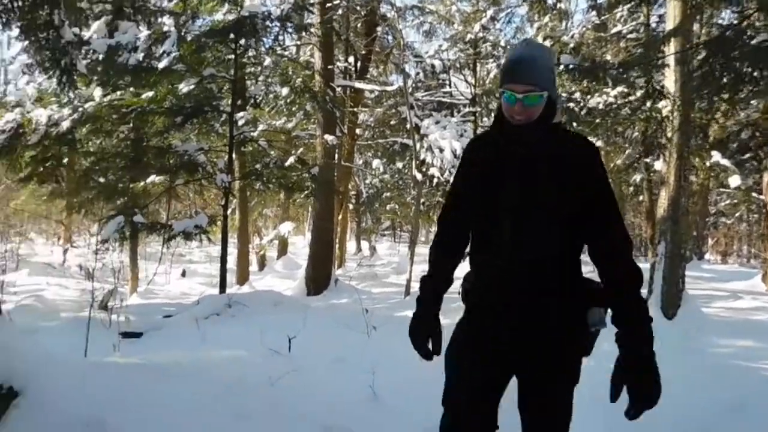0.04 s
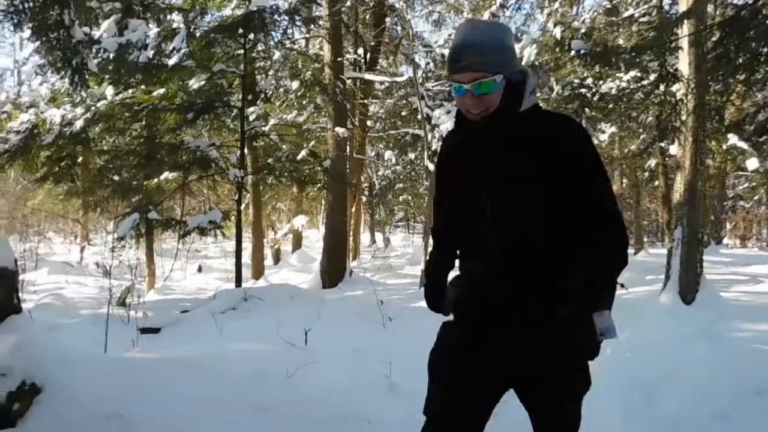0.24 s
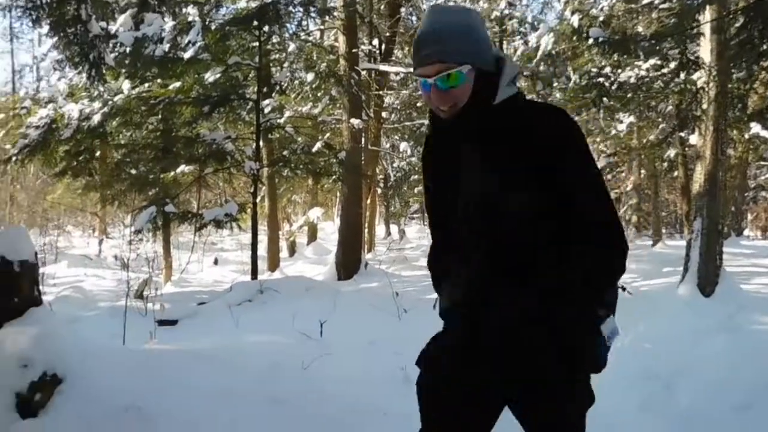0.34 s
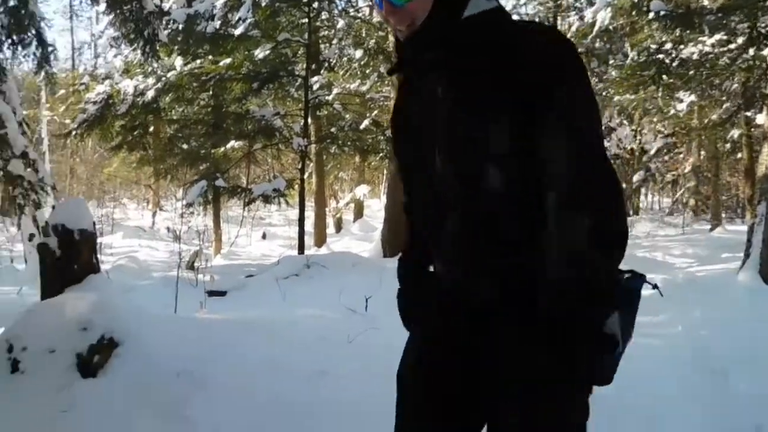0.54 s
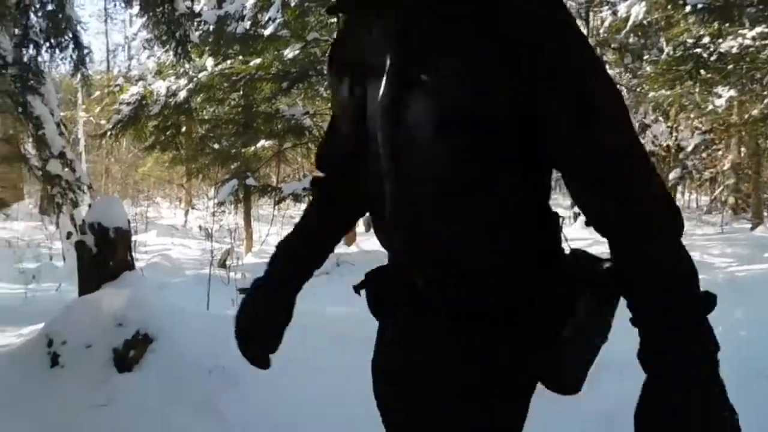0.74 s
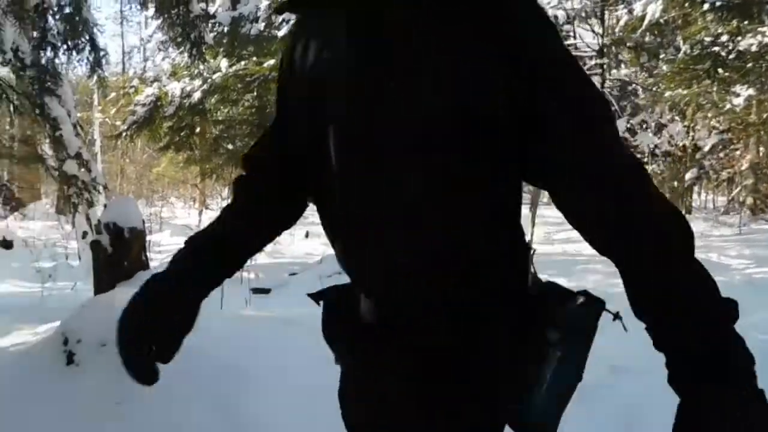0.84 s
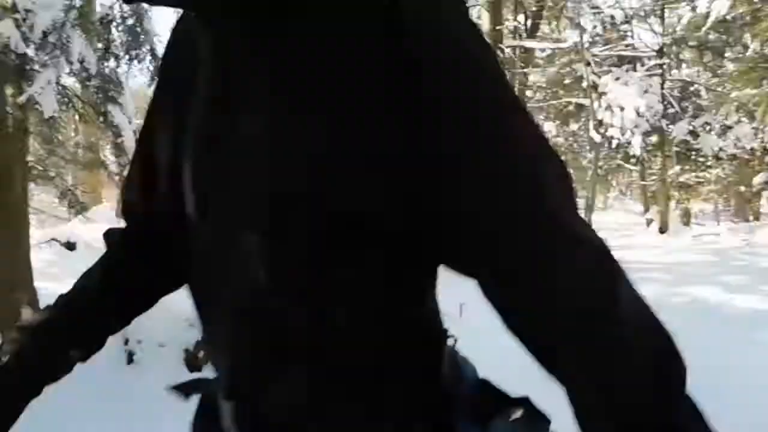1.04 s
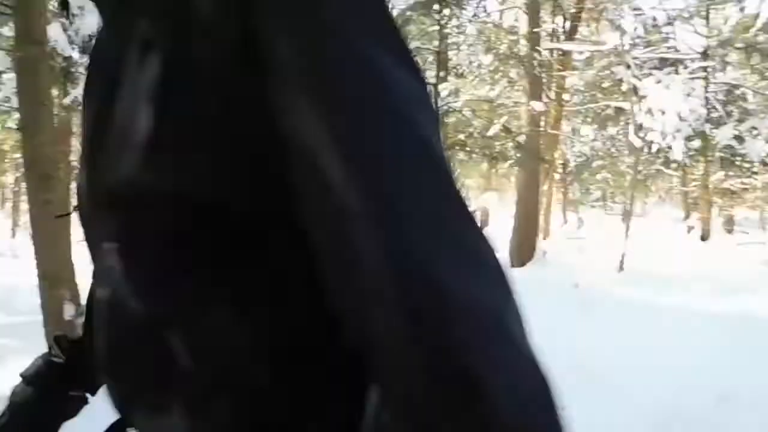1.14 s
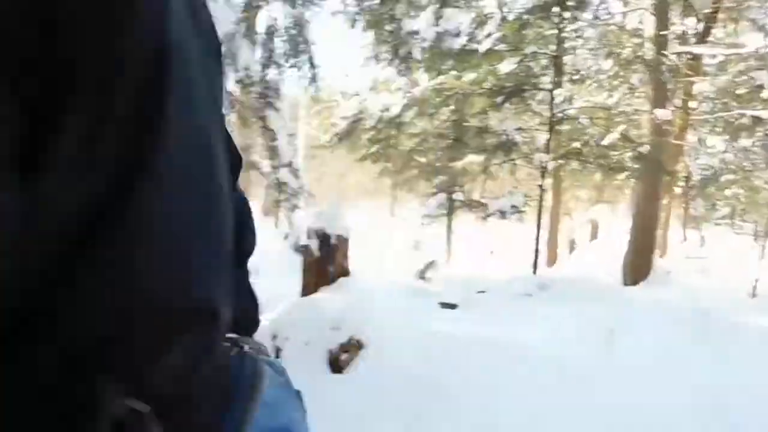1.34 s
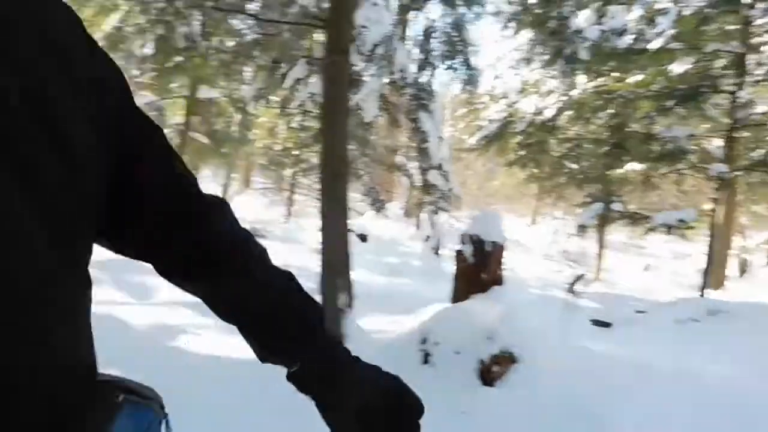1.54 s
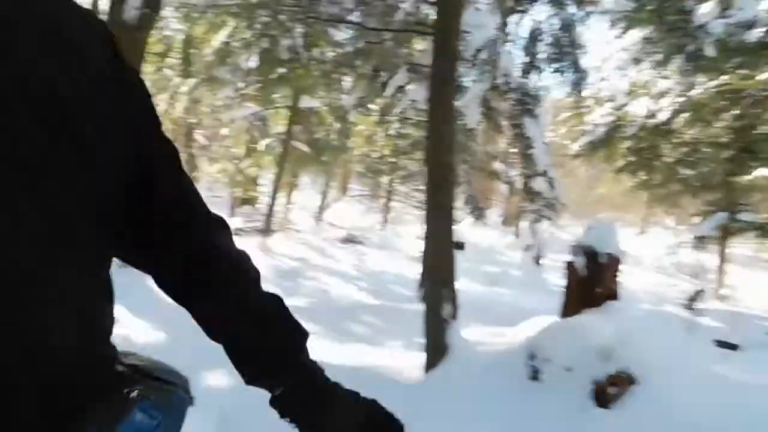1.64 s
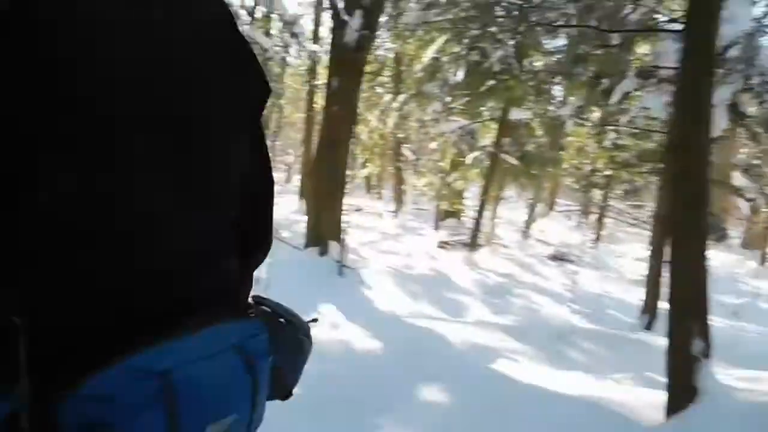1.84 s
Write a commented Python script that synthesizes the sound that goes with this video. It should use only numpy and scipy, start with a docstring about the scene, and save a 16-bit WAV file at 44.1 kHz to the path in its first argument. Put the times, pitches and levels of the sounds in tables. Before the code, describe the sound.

Boots crunch through deep, cold snow in three close steps, each a gritty cluster of creaks, knocks and squeaks with a powdery hiss; a soft brush between the first two, quiet forest air around, microphone near.

```python
"""Boots press through deep, cold snow for three steps in a quiet forest: random grain fractures, filtered and
swung in level by jerks, form each crunch; sparser fractures form a dull thud, denser ones a hiss of powder
and jacket. Stick-slip oscillation gives creaks, and decaying sines give single slips and brittle snaps.
A leg brushes through snow between two steps, faint decaying noise stands for echoes from the trees, and
coloured noise for the still air."""
import sys
import numpy as np
from scipy import signal
from scipy.fft import rfft, irfft, next_fast_len
from scipy.io import wavfile

SR = 44100
rng = np.random.default_rng(int(sys.argv[2]) if len(sys.argv) > 2 else 0)


def persist_wave(psi):
    """Save psi, clipped to +-1, as 16-bit WAV."""
    counts = np.round(np.clip(psi, -1, 1) * 32767).astype(np.int16)
    wavfile.write(sys.argv[1], SR, np.atleast_2d(counts).T)


N = 83790  # length in samples

# Background of still air. Each row: frequency in Hz, density in dB per Hz.
FOREST = [(15, -35), (25, -7.5), (114, -11), (217, -5.5), (439, -6), (3000, -14.5), (4610, -22.5),
          (9070, -26.5), (11600, -19.5), (16000, -27.5)]
# Faint air movement. Each row: frequency in Hz, density in dB per Hz.
FOREST_RUMBLE = [(25, 0), (60, -6), (130, -7)]
FOREST_DB, FOREST_RUMBLE_DB = -52.5, -78.5
FOREST_WIDE_HZ = 2700  # the left-right difference is strong above this
FOREST_SIDE = 0.22  # share of the difference signal kept at every pitch

# Stick-slip creaks. Each row: start in seconds, length in seconds, level in dB, first rate in Hz,
# last rate in Hz, rasp in dB, grit in dB (rasp and grit relative to the level).
CREAKS = [(0.2123, 0.012, -33.5, 1000, 950, -23, -2.5), (0.2387, 0.011, -35.5, 1040, 1000, -13, -1),
          (0.3762, 0.017, -33.5, 1040, 977, -22, -4.5), (0.689, 0.0098, -33.5, 982, 1022, -8, -1),
          (0.7218, 0.0142, -26, 1198, 446.5, -2.5, -6), (0.7611, 0.014, -25, 1156, 438, -6, -9)]
# Colour of the grit in creaks. Each row: frequency in Hz, density in dB per Hz.
CREAK_GRIT = [(350, 0.5), (1300, 3.5), (2600, -5), (4200, -12), (6000, -22), (14000, -22)]
CREAK_ATTACK_S, CREAK_DROP_S, CREAK_RELEASE_S = 0.002, 0.003, 0.0033
CREAK_JITTER = 0.08  # relative wander of the slip rate
CREAK_RING_HZ, CREAK_RING_WIDTH_HZ, CREAK_OVERTONE_DB = 2470, 260, -24

# Colour of the echoes from the trees. Each row: frequency in Hz, level in dB.
TRUNKS = [(150, -28.5), (450, -21), (1200, -5), (2500, -1), (5000, -29.5), (12000, -69)]
TRUNKS_DB, TRUNKS_T60_S = -19.5, 0.27

# Course of each step. Each row: time in seconds, level of the crunch in dB, level of the thud in dB,
# level of the hiss in dB.
STEP_1 = [(0.258, -57, -51, -50.5), (0.273, -39, -52, -49.5), (0.318, -38, -46, -45.5),
          (0.337, -40.5, -40, -45), (0.354, -25.5, -57, -37.5), (0.372, -35.5, -54, -36),
          (0.387, -31.5, -61, -47), (0.403, -45.5, -52, -47), (0.412, -34, -51, -49),
          (0.429, -35.5, -56, -42), (0.445, -31, -66, -43.5), (0.491, -31.5, -50, -46),
          (0.498, -68, -74, -57)]
STEP_2 = [(0.71, -50.5, -83, -59), (0.75, -43.5, -63, -51.5), (0.793, -36.5, -64, -47.5),
          (0.84, -35.5, -78, -56), (0.864, -42.5, -47, -56), (0.875, -36.5, -40.5, -44),
          (0.91, -37, -40.5, -41), (0.98, -35.5, -57, -43.5), (1.011, -33.5, -60, -42.5),
          (1.041, -30, -49, -36.5), (1.075, -35.5, -47, -37.5), (1.092, -41, -46, -47),
          (1.122, -37.5, -60, -46.5), (1.139, -38, -58, -40.5), (1.153, -45.5, -54, -52),
          (1.213, -57.5, -63, -58)]
STEP_3 = [(1.242, -47.5, -75, -60.5), (1.32, -42, -67, -48.5), (1.403, -41, -46, -48.5),
          (1.418, -39.5, -52, -53), (1.433, -33, -48, -41.5), (1.449, -47.5, -48.5, -48),
          (1.47, -35, -40, -35.5), (1.525, -37, -50, -41.5), (1.546, -31.5, -46.5, -32.5),
          (1.611, -32.5, -54, -37.5), (1.649, -40.5, -57, -45.5), (1.672, -43.5, -82, -47),
          (1.691, -52, -69, -54), (1.76, -50, -69, -54), (1.9, -49.5, -77, -57.5)]
# Colour of each step's crunch. Each row: frequency in Hz, density in dB per Hz.
CRUNCH_1 = [(120, -31), (200, -6.5), (400, -1), (637, -4), (1030, 1.5), (1430, 3.5), (1700, -12),
            (2140, -1.5), (2800, -7), (3980, -6.5), (5000, -24), (8000, -40)]
CRUNCH_2 = [(120, -42.5), (200, -6.5), (520, -6), (672, -8), (1170, -3.5), (1600, -12), (2580, -10.5),
            (5000, -28), (6500, -45)]
CRUNCH_3 = [(120, -42), (200, -11.5), (540, -2.5), (800, -8), (1750, -7.5), (2650, -17), (5000, -27.5),
            (6500, -62)]
# Colours of the thud and the hiss. Each row: frequency in Hz, density in dB per Hz.
THUD = [(50, -22), (90, -8.5), (150, -1.5), (220, 1.5), (320, -20)]
HISS = [(3000, 1.5), (4200, 3.5), (5200, 1), (7000, 1), (9000, 0), (13000, -1.5), (15500, -12.5)]
# Place of each step. Each row: crunch left over right in dB, hiss left over right in dB,
# lead of the hiss on the left in seconds.
PLACES = [(-0.5, 0, -.00003), (-1, -0.5, -.00002), (-2, 3, .00016)]
CRUNCH_PER_S, THUD_PER_S, HISS_PER_S = 2600, 580, 9000
CRUNCH_SCATTER_DB, THUD_SCATTER_DB, HISS_SCATTER_DB = 1.5, 3, -0.5  # per unit of an exponential draw
CRUNCH_SPREAD_S, HISS_SPREAD_S = 0.00003, 0.000025  # the grains lie in slightly different directions
GRAIN_PAN_DB = 2  # spread of the grains' random left-right balance
FADE_S = 0.044
CLUMP_PER_S, CLUMP_DB, CLUMP_SCATTER_DB = 170, -5.5, 3  # larger clumps among the grains
CLUMP_LOW_HZ, CLUMP_HIGH_HZ = 348, 1565
CLUMP_CYCLES = 5.6  # cycles until a clump has decayed by 60 dB
JERK_PER_S, JERK_SETTLE_S, JERK_DB = 140, 0.0066, 2.6

# Single slips of packed snow under the sole. Each row: start in seconds, knock in dB, knock in Hz,
# squeak in dB, squeak in Hz, grit in dB.
SLIPS = [(0.2657, -41, 567, -33, 830, -37), (0.351, -22.5, 530, -20, 1190, -27),
         (0.3915, -34, 645, -19, 945, -35), (0.435, -24, 333, -19.5, 1310, -43),
         (0.449, -24, 400, -23, 1050, -32), (0.4724, -27, 410, -17.5, 940, -38),
         (0.484, -19.5, 418, -18.5, 860, -20.5), (0.797, -20, 420, -21.5, 1120, -32),
         (0.811, -26, 473, -18.5, 885, -35), (0.8276, -34, 476, -18.5, 870, -28),
         (.871, -32, 583, -24, 910, -25.5), (.907, -32, 620, -18.5, 990, -25),
         (.920, -24, 595, -23, 1350, -31), (0.94, -36, 395, -21, 1140, -31),
         (.947, -47, 470, -21, 1270, -36), (1.0296, -23, 310, -17, 785, -31),
         (1.0455, -20, 516, -17, 1160, -21.5), (1.053, -20.5, 504, -44, 880, -26.5),
         (1.062, -18.5, 540, -38, 1340, -28), (1.068, -24, 527, -39, 1100, -30),
         (1.076, -17, 417, -15.5, 790, -53), (1.0806, -21, 507, -23, 755, -34),
         (1.136, -21.5, 442, -22.5, 880, -32), (1.16, -31, 397, -24, 855, -31.5),
         (1.1866, -24, 397, -28, 810, -29), (1.2556, -36, 550, -27, 1050, -33),
         (1.278, -27, 420, -29, 1380, -38), (1.2991, -20, 517, -19.5, 930, -37),
         (1.317, -20.5, 455, -31, 724, -36.5), (1.3367, -21.5, 433, -34, 1195, -38),
         (1.355, -24, 420, -33, 730, -38), (1.371, -27.5, 460, -43, 720, -41),
         (1.396, -22, 480, -37, 800, -36), (1.426, -25, 376, -28, 740, -37),
         (1.4636, -21, 517, -27, 990, -19.5), (1.5426, -23, 350, -21, 935, -23.5),
         (1.5608, -19, 480, -17, 704, -29), (1.599, -40, 448, -25, 1110, -30),
         (1.6305, -21, 570, -18, 980, -26.5), (1.6306, -30, 400, -18, 2000, -28),
         (1.6992, -29, 570, -25, 1040, -56), (1.7842, -36, 564, -32.5, 960, -39),
         (1.848, -38.5, 400, -34, 1120, -47)]
# Colour of the grit in slips. Each row: frequency in Hz, density in dB per Hz.
SLIP_GRIT = [(400, -12.5), (1000, -7.5), (1600, -0.5), (2150, -3), (2700, -26), (6000, -19.5), (14000, -38)]
SLIP_ATTACK_S, KNOCK_T60_S, SQUEAK_T60_S, GRIT_T60_S = 0.00083, 0.022, 0.013, 0.013
SLIP_LOW_HZ = 212  # slips and clumps push little air below this

# Brittle snaps. Each row: start in seconds, level in dB, tilt in dB per octave, left over right in dB,
# splinters in dB (relative to the level).
SNAPS = [(0.3577, -9.5, -18, 2, -12.5), (0.7328, -32, -1, 1, 3.5), (1.4632, -1.5, 3.5, 4.5, -20.5),
         (1.579, -24.5, 20, 8, -13)]
# Modes of a snap. Each row: frequency in Hz, level in dB, 60 dB decay time in seconds.
SNAP_MODES = [(111, -42, 0.027), (351, -24.5, 0.072), (1540, -20.5, 0.013), (2060, -17, 0.014),
              (4076, -10, 0.0077), (6230, -12.5, 0.0043), (7070, -3, 0.0032), (9640, -4.5, 0.00089),
              (12400, -11.5, 0.0011)]
SNAP_TILT_HZ = 5120  # pitch at which the tilt changes nothing
SNAP_TILT_FROM_HZ = 4700  # all modes below share the tilt gain of this pitch
SNAP_ATTACK_S, SPLINTER_T60_S = 0.00012, 0.016

# Colour of the leg's brush through snow. Each row: frequency in Hz, density in dB per Hz.
RUSTLE = [(350, 0), (1400, -2), (2650, 2), (3300, -12.5), (12000, -21.5)]
RUSTLE_SPAN_S, RUSTLE_DB = (0.52, 0.684), -48.5

TOP_HZ = 16000


def undb(db):
    """Amplitude gain is ten to the power of decibels over twenty."""
    return 10 ** (np.asarray(db) / 20)


def unit(x):
    """Normalisation by signal power: scale to rms 1."""
    return x / np.sqrt(np.mean(x ** 2) + 1e-18)


def pan(db):
    """Level-difference stereo: left and right gains, positive towards the left."""
    return undb(np.array([[db], [-db]]) / 2)


def fade(t, t60):
    """Exponential decay, reaching -60 dB after t60 seconds."""
    return undb(-60 * t / max(t60, 1e-4))


def add(out, start, x):
    """Linear superposition: mix a short sound in at its time."""
    i = int(start * SR)
    out[:, i:i + x.shape[-1]] += x[..., :N - i]


def colour(x, points):
    """Minimum-phase filtering through (Hz, dB) points, by folding the cepstrum; rms 1."""
    hz, db = np.array(sorted(points), float).T
    size = next_fast_len(2 * N)
    octave = np.log2(np.maximum(np.fft.rfftfreq(size, 1 / SR), 1))
    knots = np.log2(hz)
    # outside the points: a fall of 18 dB per octave, 50 dB at most
    octaves_outside = abs(octave - np.clip(octave, knots[0], knots[-1]))
    gain_db = np.interp(octave, knots, db) - np.minimum(18 * octaves_outside, 50)
    cepstrum = irfft(np.log(undb(gain_db)), size)
    cepstrum[1:size // 2] *= 2
    cepstrum[size // 2 + 1:] = 0
    response = np.exp(rfft(cepstrum, size))
    return unit(irfft(rfft(x, size) * response, size)[..., :x.shape[-1]])


def high_pass(x, hz, order=2):
    """Butterworth high-pass filtering: cut the bass."""
    return signal.sosfilt(signal.butter(order, hz, "high", fs=SR, output="sos"), x)


def walk(rate, count=N):
    """Interpolated random values, rate per second: a wandering with a spread near 1."""
    return np.interp(np.arange(count) / SR * rate, np.arange(count), rng.standard_normal(count))


def forest():
    """Broadband noise of still air, with a partly independent left-right difference, and a faint rumble."""
    mid, side = rng.standard_normal((2, N))
    side = FOREST_SIDE * side + (1 - FOREST_SIDE) * high_pass(side, FOREST_WIDE_HZ, order=1)
    air = colour(np.array([mid + side, mid - side]), FOREST)
    level_db = FOREST_DB + 0.46 * walk(23.3)
    rumble = colour(rng.standard_normal((2, N)), FOREST_RUMBLE) * undb(FOREST_RUMBLE_DB)
    return air * undb(level_db) + rumble


def creaks(grit):
    """Stick-slip oscillation: the sole slips hundreds of times a second or more; slower slips are larger."""
    out, t = np.zeros((2, N)), np.arange(SR // 25) / SR
    ring = np.exp(-np.pi * CREAK_RING_WIDTH_HZ * t) * np.sin(2 * np.pi * CREAK_RING_HZ * t)
    for start, length, db, first_hz, last_hz, rasp_db, grit_db in CREAKS:
        rate = last_hz + (first_hz - last_hz) * np.exp(-(t / CREAK_DROP_S) ** 4)
        cycles = np.cumsum(rate * (1 + CREAK_JITTER * walk(840.0, len(t)))) / SR
        overtone = undb(CREAK_OVERTONE_DB) * np.sin(2 * np.pi * 2 * cycles)
        tone = unit(np.sin(2 * np.pi * cycles) + overtone) * (last_hz / rate) ** 1.5
        # rasp: one impulse per slip, of random size, excites a resonance
        releases = np.diff(np.floor(cycles), prepend=-1) * undb(3.6 * rng.standard_normal(len(t)))
        rasp = unit(signal.fftconvolve(releases, ring)[:len(t)]) * undb(rasp_db) * rate / first_hz
        crumbs = np.roll(grit, -int(start * SR), axis=1)[:, :len(t)] * undb(grit_db)
        attack = np.minimum(t / CREAK_ATTACK_S, 1)
        release = np.exp(-np.maximum(t - length + CREAK_RELEASE_S, 0) / CREAK_RELEASE_S)
        add(out, start, undb(db) * attack * release * (tone + rasp + crumbs))
    return out


def trunks(x):
    """Diffuse reverberation: convolution with decaying noise gives a faint scatter of echoes from the trees."""
    t = np.arange(SR // 2) / SR
    noise = colour(rng.standard_normal((2, len(t))), TRUNKS)
    echoes = unit(noise * fade(t, TRUNKS_T60_S) * np.minimum(t / 0.0042, 1))
    return undb(TRUNKS_DB) * signal.fftconvolve(x, echoes / np.sqrt(len(t)), axes=1)[:, :N]


def grains(per_s, scatter_db, spread_s=0, lead_s=0, pan_db=0):
    """Shot noise of random fractures, each reaching the two channels with its own lag and balance."""
    chance, size = rng.random(N), rng.exponential(size=N)
    side, sign = rng.standard_normal(N), rng.choice([-1, 1], N)
    at = np.flatnonzero(chance < per_s / SR)
    push = sign[at] * undb(scatter_db * np.minimum(size[at], 5))
    out, taps = np.zeros((2, N)), np.arange(-4, 5)[:, None]
    for channel, way in enumerate((-1, 1)):
        place = at + way * (lead_s + spread_s * side[at]) * SR / 2
        near = np.round(place).astype(int) + taps
        heard = push * undb(-way * pan_db * side[at] / 2)
        # sinc interpolation sets each impulse between samples
        impulses = heard * np.sinc(near - place)
        out[channel] = np.bincount((near % N).ravel(), impulses.ravel(), N)
    return out


def clumps():
    """Shear failure of small clumps at random: each a damped squeak of a few cycles at its own pitch."""
    out, t = np.zeros((1, N)), np.arange(SR // 30) / SR
    gaps, pitches, sizes = rng.exponential(size=800), rng.random(800), rng.standard_normal(800)
    for start, pitch, size in zip(np.cumsum(gaps) / CLUMP_PER_S, pitches, np.clip(sizes, -2, 1)):
        if start < N / SR:
            hz = CLUMP_LOW_HZ * (CLUMP_HIGH_HZ / CLUMP_LOW_HZ) ** pitch
            squeak = fade(t, CLUMP_CYCLES / hz) * np.sin(2 * np.pi * hz * t)
            add(out, start, undb(CLUMP_SCATTER_DB * size) * squeak)
    return unit(high_pass(out, SLIP_LOW_HZ))


def jerks():
    """Intermittent yielding: level swings in dB, a sudden rise at uneven intervals, then a quick settling."""
    t = np.arange(N) / SR
    starts = np.append(0, np.cumsum(0.5 + rng.random(800)) / JERK_PER_S)
    sizes = 0.5 + rng.random(len(starts))
    last = np.searchsorted(starts, t, "right") - 1
    swing = sizes[last] * np.exp(-(t - starts[last]) / JERK_SETTLE_S)
    return JERK_DB * unit(swing - swing.mean())


def step(levels, crunch_colour, place):
    """Granular collapse under the boot: crunch and hiss swing together in jerks over a thud of packed snow."""
    t = np.arange(N) / SR
    times, *columns = np.array(levels, float).T
    gate = np.exp(-(abs(t - np.clip(t, times[0], times[-1])) / FADE_S) ** 2)
    crunch_db, thud_db, hiss_db = (np.interp(t, times, column) for column in columns)
    crunch_pan, hiss_pan, lead = place
    jerk_db = jerks()
    # the crunch leads on the left by half as much as the hiss
    crushed = grains(CRUNCH_PER_S, CRUNCH_SCATTER_DB, CRUNCH_SPREAD_S, lead / 2, GRAIN_PAN_DB)
    crunch = unit(colour(crushed, crunch_colour) + undb(CLUMP_DB) * clumps())
    crunch = crunch * undb(crunch_db + jerk_db)
    thud = colour(grains(THUD_PER_S, THUD_SCATTER_DB), THUD) * undb(thud_db)
    powder = grains(HISS_PER_S, HISS_SCATTER_DB, HISS_SPREAD_S, lead)
    hiss = colour(powder, HISS) * undb(hiss_db + jerk_db)
    return gate * ((crunch + thud) * pan(crunch_pan) + hiss * pan(hiss_pan))


def slips(grit):
    """Damped oscillation after single jerks: a hollow knock of the sole, a squeak of shearing snow and grit."""
    out, t = np.zeros((2, N)), np.arange(SR // 25) / SR
    attack = np.minimum(t / SLIP_ATTACK_S, 1)
    for start, knock_db, knock_hz, squeak_db, squeak_hz, grit_db in SLIPS:
        knock = undb(knock_db) * fade(t, KNOCK_T60_S) * np.sin(2 * np.pi * knock_hz * t)
        squeak = undb(squeak_db) * fade(t, SQUEAK_T60_S) * np.sin(2 * np.pi * squeak_hz * t)
        crumbs = np.roll(grit, -int(start * SR), axis=1)[:, :len(t)]
        crumbs = crumbs * undb(grit_db) * fade(t, GRIT_T60_S)
        add(out, start, (knock + squeak) * attack + crumbs)
    return high_pass(out, SLIP_LOW_HZ) * pan(db=-2.0)


def snaps():
    """Modal ringing after brittle fracture of crust or a buried twig: short damped modes and a few splinters."""
    out, t = np.zeros((2, N)), np.arange(SR // 40) / SR
    splinters = colour(grains(HISS_PER_S, HISS_SCATTER_DB, HISS_SPREAD_S), HISS)
    attack = np.minimum(t / SNAP_ATTACK_S, 1)
    for start, db, tilt_db, pan_db, splinter_db in SNAPS:
        ring = np.zeros(len(t))
        for hz, mode_db, t60 in SNAP_MODES:
            octaves = np.log2(max(hz, SNAP_TILT_FROM_HZ) / SNAP_TILT_HZ)
            ring += undb(mode_db + tilt_db * octaves) * fade(t, t60) * np.sin(2 * np.pi * hz * t)
        spray = np.roll(splinters, -int(start * SR), axis=1)[:, :len(t)]
        spray = spray * undb(splinter_db) * fade(t, SPLINTER_T60_S)
        add(out, start, undb(db) * pan(pan_db) * (ring + spray) * attack)
    return out


def rustle():
    """Granular friction: between two steps the leg swings forward and brushes softly through loose snow."""
    t = np.arange(N) / SR
    gate = np.exp(-(abs(t - np.clip(t, *RUSTLE_SPAN_S)) / FADE_S) ** 2)
    brushed = grains(CRUNCH_PER_S, CRUNCH_SCATTER_DB, CRUNCH_SPREAD_S)
    return gate * undb(RUSTLE_DB) * colour(brushed, RUSTLE)


def scene():
    """Superposition of the walker's sounds, their echoes from the trees and the still air."""
    grit = grains(HISS_PER_S, CRUNCH_SCATTER_DB, CRUNCH_SPREAD_S)
    walker = creaks(colour(grit, CREAK_GRIT)) + slips(colour(grit, SLIP_GRIT)) + snaps() + rustle()
    for parts in zip((STEP_1, STEP_2, STEP_3), (CRUNCH_1, CRUNCH_2, CRUNCH_3), PLACES):
        walker = walker + step(*parts)
    return walker + trunks(walker) + forest()


def record(dry):
    """Band limiting: a steep elliptic low-pass removes the highest treble."""
    return signal.sosfilt(signal.ellip(8, 0.2, 70, TOP_HZ, fs=SR, output="sos"), dry)


dry = scene()
out = record(dry)
persist_wave(out)
```